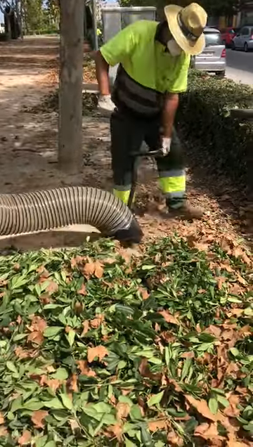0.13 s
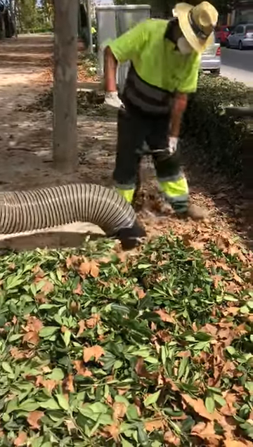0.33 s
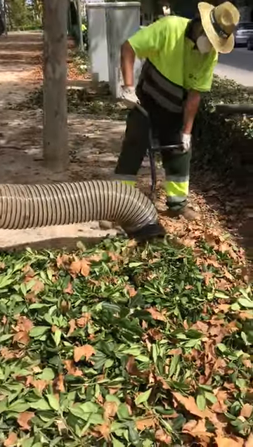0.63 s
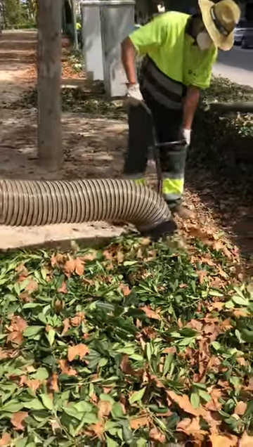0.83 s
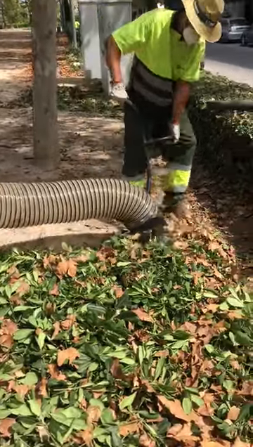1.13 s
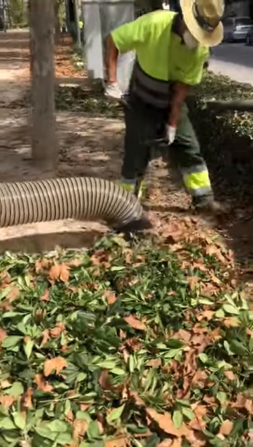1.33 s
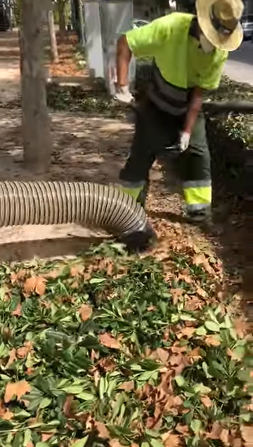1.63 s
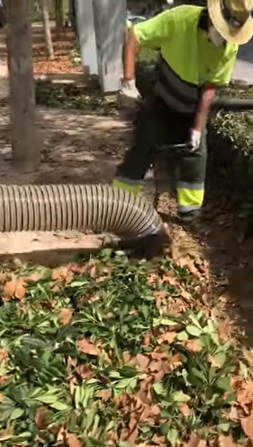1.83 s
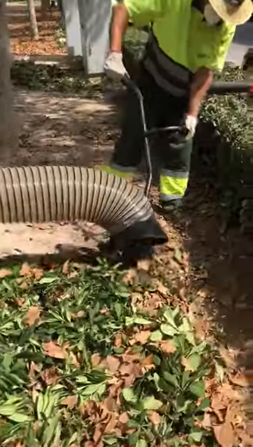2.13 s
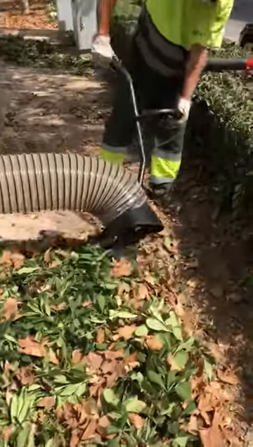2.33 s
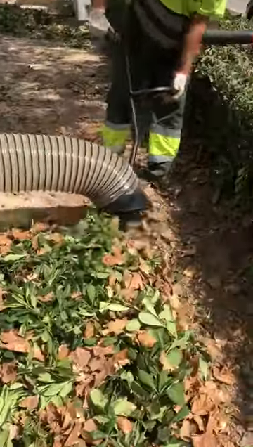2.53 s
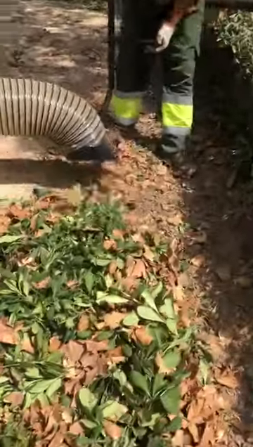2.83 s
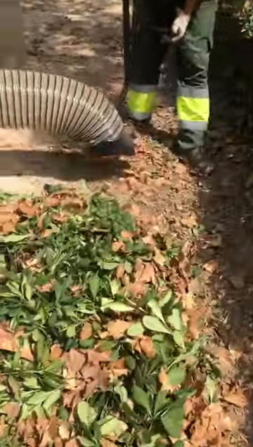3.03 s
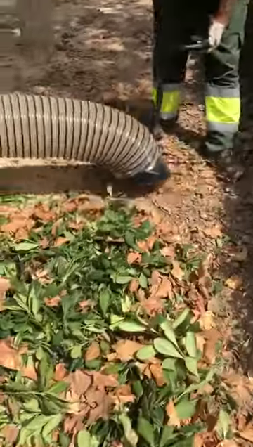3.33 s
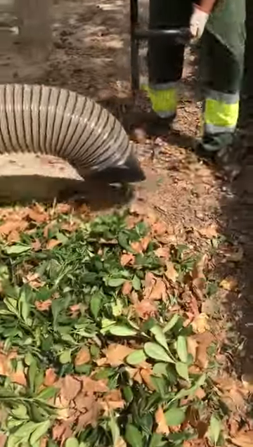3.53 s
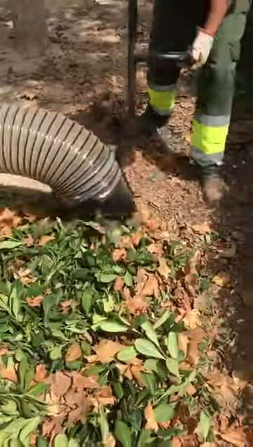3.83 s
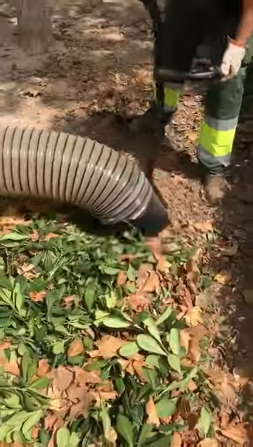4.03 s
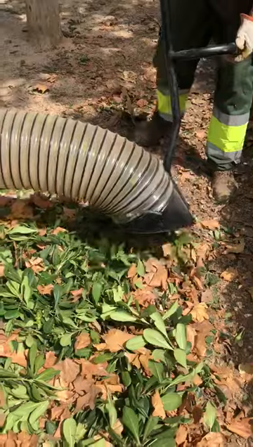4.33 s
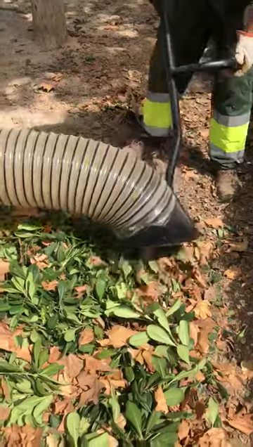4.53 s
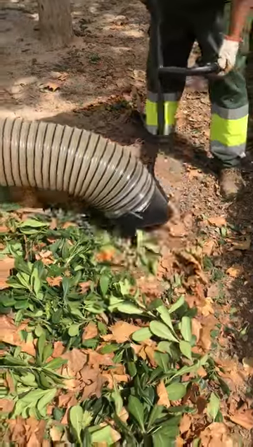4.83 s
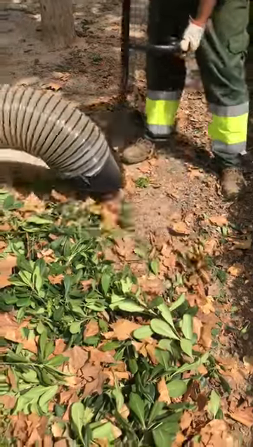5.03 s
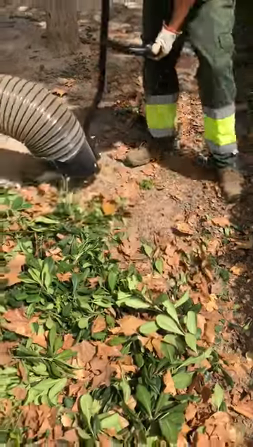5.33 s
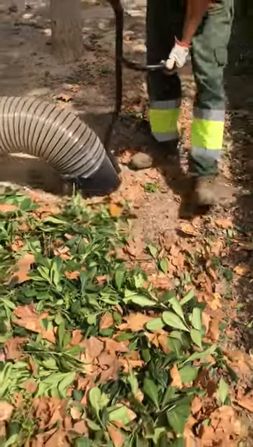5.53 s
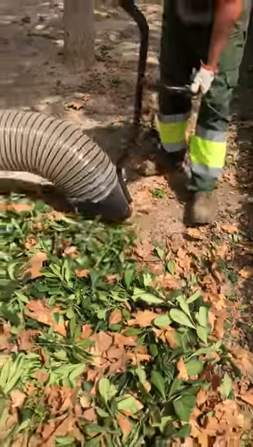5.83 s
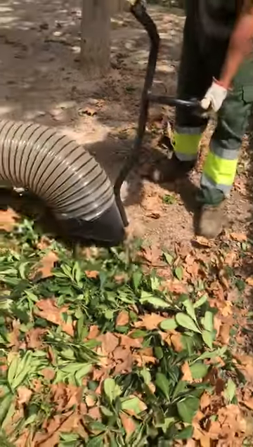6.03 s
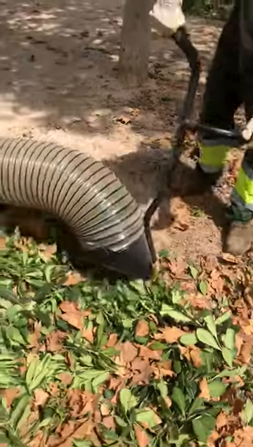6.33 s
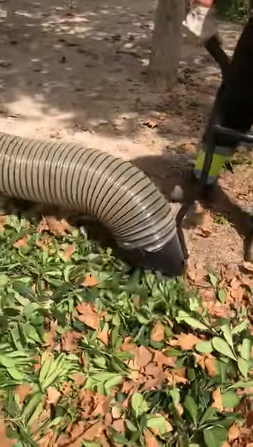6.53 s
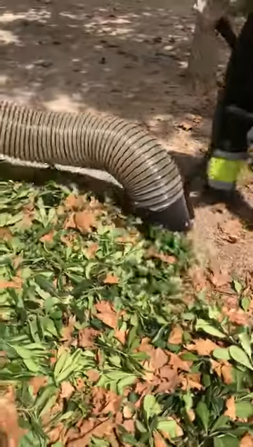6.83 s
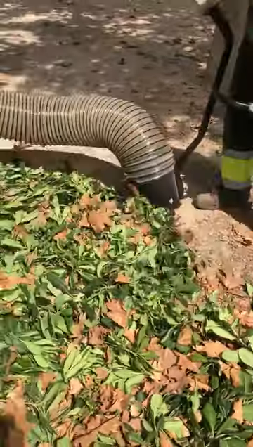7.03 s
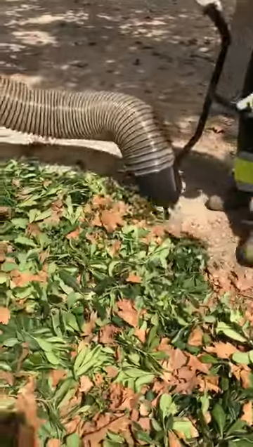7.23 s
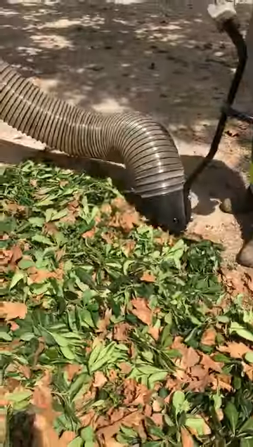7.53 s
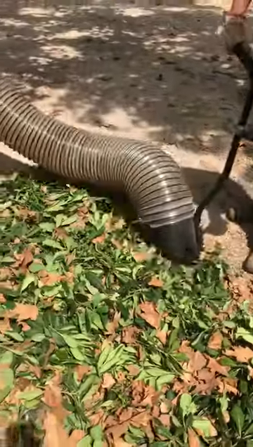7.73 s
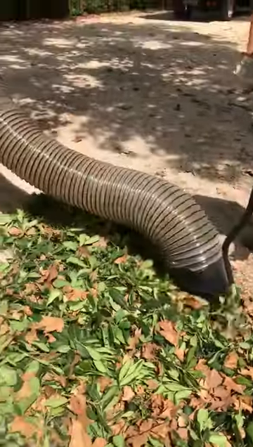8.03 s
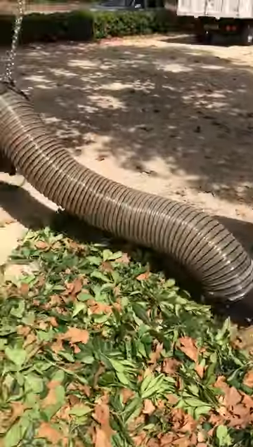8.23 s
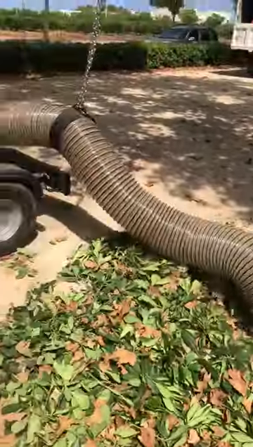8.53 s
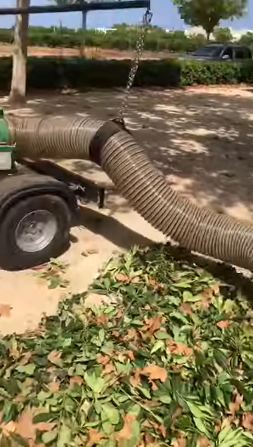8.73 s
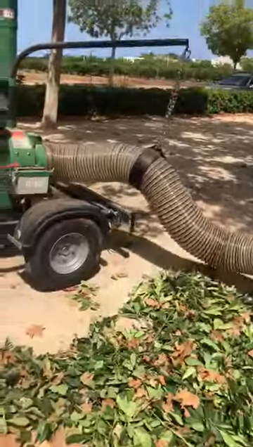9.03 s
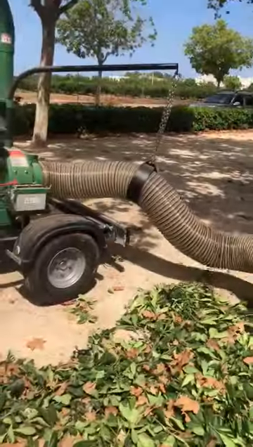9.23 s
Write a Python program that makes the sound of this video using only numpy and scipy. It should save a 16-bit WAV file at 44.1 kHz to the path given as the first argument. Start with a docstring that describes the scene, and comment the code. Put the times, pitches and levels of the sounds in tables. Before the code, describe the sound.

Engine-driven fan hums low under rushing hose air, with bursts of crunching leaves, sharp twig ticks, stone pings and dull thumps growing denser.

```python
"""A leaf vacuum on a trailer runs beside a street for nine seconds, heard a few metres away.
From the start a four-stroke engine turns a four-blade fan (steady tones) and air roars up the ribbed hose
(coloured noise). Gulps of leaves crackle at once, twigs snap (click and noise burst), stones ring the fan
wheel (fading tones), and from 0.6 s clumps thud on the hose (low fading tones). The main blade tone peaks
near 3.6 s, the hardest thud comes at 5.2 s, gulps crowd in after 6 s, and the strongest bursts at 8.8 s."""
import sys
import numpy as np
from scipy import signal
from scipy.io import wavfile
from scipy.ndimage import uniform_filter1d

SR = 44100
rng = np.random.default_rng(int(sys.argv[2]) if len(sys.argv) > 2 else 0)


def store_pcm(level_fs):
    """Save levels as 16-bit WAV."""
    pcm = np.round(np.clip(level_fs, -1, 1) * 32767).astype(np.int16)
    wavfile.write(sys.argv[1], SR, np.atleast_2d(pcm).T)


N = 414099
T = np.arange(N) / SR  # time, s
COARSE_T = T[::64]  # a coarser clock for slow curves, s

# All levels are as they stand before the ground and the microphone.
# fan speed and its lower tones: (t/s, blade rate f/Hz, blade tone level/dB, 2nd harmonic level/dB)
FAN_SPEED = [(0, 206.2, -21, -36.5), (.55, 207.7, -21, -35), (1.02, 208.4, -27, -38.5),
             (1.14, 207.7, -36, -40), (1.21, 209, -24, -37), (1.62, 207.5, -27.5, -32.5),
             (1.8, 209.4, -21.5, -38.5), (2, 210.5, -15.5, -42), (2.25, 210.1, -18, -50),
             (2.48, 207.4, -18, -50), (2.56, 206.7, -15, -31.5), (2.77, 206.3, -17.5, -41),
             (2.95, 208.5, -17.5, -30.5), (3.11, 207, -15, -38.5), (3.48, 210.2, -17.5, -28.5),
             (3.63, 204, -12, -47), (3.72, 203.3, -20, -39), (3.95, 205.2, -17.5, -29),
             (4.13, 208.6, -16, -51.5), (4.47, 208.6, -14.5, -32.5), (4.84, 206, -15.5, -39),
             (5, 208.8, -18.5, -38.5), (5.33, 209.2, -20, -28.5), (5.65, 206.5, -21, -44),
             (5.95, 208, -24, -30), (6.4, 207.8, -25, -34.5), (7.01, 205, -25, -31.5),
             (7.5, 205.7, -27, -33), (7.79, 207.6, -22, -27), (7.9, 209.6, -32, -33),
             (8.22, 208.3, -39, -28.5), (8.3, 207, -22, -26.5), (8.55, 205.5, -30, -32),
             (8.84, 204, -20.5, -32), (9.15, 206, -18, -48), (9.39, 209.4, -16.5, -31)]
# higher blade tones: (t/s, 3rd harmonic level/dB, 4th harmonic level/dB)
UPPER_BLADE_TONES = [(0, -37, -35), (.8, -50, -39), (1.3, -40, -37), (2.4, -39, -38.5), (3.4, -42, -44),
                     (4.1, -36, -51), (5.2, -44, -39.5), (6.5, -34, -39), (7.9, -32, -46), (8.3, -34, -30),
                     (9.39, -35.5, -48)]
# exhaust tones, as multiples of the engine cycle rate: (multiple)
EXHAUST_MULTIPLES = [2, 3, 4, 5, 6, 7, 9, 10, 11, 12, 13, 14, 18, 22, 28]
# how loud each exhaust tone is: (level/dB)
EXHAUST_LEVELS = [-39, -36.5, -35.5, -25.5, -33, -34.5, -38, -42.5, -46.5, -46, -40.5, -47.5, -43, -47, -43]
# air in the hose with no gulp: (t/s, roar level/dB, rumble level/dB, buffeting level/dB)
AIR_LEVELS = [(0, -26, -31, -36.5), (.5, -27.5, -30, -35), (.95, -28.5, -38, -34), (1.4, -27, -27, -36),
              (1.7, -27, -42, -36), (2.2, -28, -31, -34), (2.5, -27, -27, -30), (2.9, -27.5, -26.5, -35),
              (3.4, -27.5, -26, -31), (3.8, -26, -30, -30), (4.2, -27, -30, -32), (4.6, -27, -24, -29),
              (5, -26, -22, -26), (5.45, -24.5, -28.5, -36), (5.62, -25.5, -23, -28),
              (5.8, -26.5, -27, -31), (6.2, -24.5, -27.5, -32), (6.6, -23.5, -22, -36),
              (7, -24, -30.5, -29), (7.5, -24.5, -25.5, -44), (7.9, -24, -26.5, -26), (8.4, -25, -25, -34),
              (8.8, -24, -23, -33), (9.1, -26.5, -36, -30), (9.39, -24.5, -32, -35)]
# colour of the rumble: (f/Hz, level/dB)
RUMBLE_COLOUR = [(70, -30.5), (92, -19), (105, -0.5), (116, 1.5), (142, -10), (170, 0), (185, 0.5),
                 (225, -6), (270, -19.5), (330, -29.5), (600, -58)]
# colour of the roar: (f/Hz, level/dB)
ROAR_COLOUR = [(150, -31), (260, -0.5), (330, -1.5), (430, -5.5), (520, -2.5), (640, 1), (830, 0),
               (1000, -4), (1400, -30.5)]
# colour of the steady hiss: (f/Hz, level/dB)
HISS_COLOUR = [(700, -21), (1000, -1.5), (1220, 7), (1350, 1.5), (2100, 1), (2600, -4), (3400, 0),
               (4400, -4), (12000, -3)]
# colour of the deep buffeting: (f/Hz, level/dB)
BUFFET_COLOUR = [(25, -22), (45, -9), (65, -3), (85, -0.5), (120, -15), (200, -51)]
# colour of shredded leaves and snapped twigs: (f/Hz, level/dB)
SHRED_COLOUR = [(200, -7.5), (430, -11), (640, 1.5), (1020, -4), (1220, 3), (1350, -2), (1600, 1.5),
                (2150, 1), (2600, -2), (3400, 0), (4500, -3), (12000, -6)]
# thin stream of leaves between the gulps: (t/s, level/dB)
LEAF_STREAM = [(0, -26), (.5, -27), (1, -28.5), (1.8, -29), (2.5, -24.5), (2.75, -32), (3.3, -27.5),
               (4, -29), (4.4, -28), (5, -29.5), (5.75, -30.5), (6.1, -22.5), (6.8, -33), (7.8, -28),
               (8.2, -26), (9.1, -22), (9.39, -29)]
# gulps passing the fan: (peak t/s, peak level/dB, time to fade 10 dB t/s, brightness/dB per octave);
# a negative fading time turns the shape round: a slow swell, then a quicker fade
LEAF_GULPS = [(0.029, -17, .04, 2), (.15, -17, 0.06, -0.5), (.23, -13, .035, -1.5), (.33, -17.5, .06, 1),
              (.4, -17.5, 0.08, 1), (.6, -27, 0.4, -2), (.71, -20, 0.02, 0.5), (1.2, -21.5, 0.12, -2.5),
              (1.31, -26, 0.17, 2), (1.36, -22.5, 0.1, -3.5), (1.43, -21, 0.13, 0), (1.99, -24.5, .1, -2.5),
              (2.41, -25, .06, -2), (2.58, -21.5, .06, 0), (2.66, -21, .025, 0), (2.85, -20.5, .04, 0),
              (2.9, -25, .05, 1), (3.59, -13, 0.06, -0.5), (4.5, -21.5, 0.2, 0), (4.57, -17.5, 0.12, -1),
              (4.69, -21.5, 0.14, 0), (4.76, -20.5, 0.02, -1), (5.12, -24.5, 0.08, -2),
              (5.23, -20, 0.06, -0.5), (5.33, -18, 0.1, -2.5), (5.6, -22.5, -0.06, -2),
              (5.91, -26.5, 0.46, 1.5), (6.29, -22.5, .05, -4.5), (6.49, -20.5, 0.07, -1.5),
              (6.62, -19, 0.13, -1.5), (6.72, -21.5, 0.12, 1.5), (6.88, -18, .12, -.5),
              (7.02, -15, .06, -1.5), (7.06, -17, -0.03, -1), (7.17, -21.5, 0.2, -1.5),
              (7.24, -20, 0.17, -0.5), (7.33, -20, 0.1, -2.5), (7.399, -16, 0.05, -1.5),
              (7.5, -23, -0.04, 5), (7.63, -19, .07, -2), (7.74, -22.5, .065, -4), (7.9, -21, -0.03, .5),
              (8., -18.5, 0.09, 0.5), (8.21, -21.5, 0.1, 0), (8.29, -20, 0.1, -4), (8.34, -17, .04, -1.5),
              (8.47, -20, 0.03, 1), (8.51, -20, .05, -2.5), (8.66, -18, .04, -1), (8.71, -17.5, 0.1, -3),
              (8.761, -8.5, 0.01, -1), (8.86, -20.5, 0.13, -1), (8.92, -24, 0.1, 0), (9.01, -23, 0.3, -4),
              (9.31, -22, .1, 0.5)]
# twigs and clumps striking the blades: (t/s, level/dB, brightness/dB per octave)
TWIG_SNAPS = [(0.141, -23.5, 2), (0.5913, -18, -1.5), (0.685, -14, -0.5), (0.7781, -19, -4),
              (1.3488, -16.5, -2), (1.4177, -12.5, 0), (1.5735, -14, 5), (2.8225, -17.5, 0.5),
              (2.9001, -22.5, 1), (3.457, -23, -3), (3.5458, -20, -11), (4.2532, -19.5, -6),
              (4.4746, -20, -2), (4.5168, -18.5, -4), (4.6701, -22, -4), (5.1147, -16.5, -4.5),
              (5.2145, -17.5, -3), (5.5319, -15, 8.5), (5.7621, -22, 1.5), (5.8907, -16, 1),
              (6.068, -16, 4), (6.189, -23, 3), (6.4815, -16.5, -2.5), (6.542, -19, -9), (6.5935, -15, 2),
              (7.4937, -20, 0), (7.612, -12, 1), (7.86, -20.5, -1), (7.8984, -21.5, -3),
              (7.9618, -19, -5.5), (8.2008, -22.5, -2), (8.2924, -13.5, 1.5), (8.708, -30, -3),
              (8.748, -26, -10), (9.03, -18.5, -2.5), (9.0748, -18, 1)]
# stones on the fan wheel: (t/s, level/dB, brightness/dB per octave)
STONE_HITS = [(0.328, -26, -8), (2.4883, -28, -4), (2.6247, -35, 13), (3.8448, -32, 3), (4.1, -32, -16),
              (4.9061, -31, -13), (6.1044, -28.5, 15.5), (6.2584, -30.5, 7), (6.7197, -27.5, -5),
              (7.926, -30.5, 7), (8.01, -21, 8), (8.844, -20.5, 1)]
# pitches at which the steel wheel rings: (f/Hz)
WHEEL_PITCHES = [3185, 4114, 5232, 6534, 7203, 7990, 11412]
# how the wheel rings at each pitch: (level/dB, time to fade 60 dB t/s)
WHEEL_RINGING = [(-5, .4), (0, 0.37), (-3, 0.3), (-4, .3), (-4, 0.065), (-0.5, 0.22), (-3, 0.13)]
# heavy clumps along the hose wall: (t/s, level before the soft start/dB, f/Hz)
HOSE_THUDS = [(0.619, -11, 127), (2.598, -11, 135), (3.586, -8, 135.8), (4.257, -9, 110.3), (4.56, -5, 156),
              (4.739, -8, 122.7), (5.21, -2, 124), (5.329, -7, 128.9), (5.589, -5, 122.2), (6.479, -6, 121),
              (7.429, -7.5, 139), (7.849, -8, 139), (7.889, -8, 140.5), (8.749, -19, 128),
              (9.085, -10, 139)]
# the bounce off the ground cancels a band that slides down as the listener turns: (t/s, f/Hz, depth/dB)
GROUND_BAND = [(0, 1090, -4.5), (2.5, 1074, -5.5), (4.5, 966, -7), (6, 953.8, -7), (7.5, 916, -10),
               (8.5, 869, -9), (9.39, 860, -7)]
# microphone and its housing: (f/Hz, level/dB)
MIC_COLOUR = [(20, -21), (38, -7), (50, -1), (4800, -2), (5500, -2), (5850, -15), (6140, -26.5),
              (6500, -12), (7250, -6), (8200, -16.5), (9100, -22), (9800, -17.5), (11000, -27.5),
              (11800, -37)]

BLADES_PER_CYCLE = 8  # four blades, two turns a cycle
HISS_DB = -25.5
# how far the fullest gulp lifts each layer of the air, dB
LOAD_ROAR_DB, LOAD_RUMBLE_DB, LOAD_BUFFET_DB = 2.5, 4.5, 2
RISE_SHARE = 0.64  # a gulp swells 10 dB in this share of its fading time
TEARS_PER_S, GRIT_PER_S, GRIT_DB = 1200, 150, -30.5
SNAP_RISE_S, SNAP_T60_S = 0.0014, 0.12  # T60: time to fade 60 dB
CRACK_S, CRACK_DB, CLICK_DB = 0.004, 0.5, 7
THUD_RISE_S, THUD_T60_S = 0.011, 0.1
DIP_WIDTH_HZ = 95  # half-width of the bell-shaped dip (one sigma)
EDGE_HZ = 11900  # top of the recorded band

BLADE_HZ = np.interp(T, *np.transpose(FAN_SPEED)[:2])
CYCLE = 2 * np.pi * np.cumsum(BLADE_HZ) / BLADES_PER_CYCLE / SR  # engine phase, radians


def machine():
    """Blade and exhaust tones share one shaft; turbulence makes each waver in level and phase."""
    blades = curves(FAN_SPEED)[1:] + curves(UPPER_BLADE_TONES)
    tones = [(BLADES_PER_CYCLE * (k + 1), db) for k, db in enumerate(blades)]
    tones += [*zip(EXHAUST_MULTIPLES, EXHAUST_LEVELS)]
    out = np.zeros(N)
    for multiple, db in tones:
        shake = wander(8.7)
        # the same drift played backwards moves the phase
        phase = multiple * CYCLE + 2 * np.pi * rng.random() + 0.26 * shake[::-1]
        out += np.sqrt(2) * amp(db + 1.35 * shake) * np.cos(phase)
    return out


def roar():
    """Air rushing up the hose: noise that throbs with each turn of the shaft and swells with gulps."""
    throb = 1 + 0.1 * np.cos(2 * CYCLE) + 0.098 * np.cos(2 * 2 * CYCLE)
    noise = rng.standard_normal(N) * throb * amp(1.1 * wander(23.0))
    level_db = curves(AIR_LEVELS)[0] + LOAD_ROAR_DB * load()
    return amp(level_db) * evened(colour(noise, ROAR_COLOUR))


def rumble():
    """The low, lumpy part of the air column, also swelling with each gulp."""
    noise = rng.standard_normal(N) * amp(3.0 * wander(20.0))
    level_db = curves(AIR_LEVELS)[1] + LOAD_RUMBLE_DB * load()
    return amp(level_db) * evened(colour(noise, RUMBLE_COLOUR))


def hiss():
    """Air at the fan outlet: noise with small flickers at three speeds around a steady level."""
    flicker_db = 0.7 * wander(7.0) + 1.5 * wander(30.0) + 0.73 * wander(200.0)
    noise = rng.standard_normal(N) * amp(flicker_db)
    return amp(HISS_DB) * evened(colour(noise, HISS_COLOUR))


def leaves():
    """Shredding: many small clumped tears, each with a short rattle in the housing, plus ringing grit."""
    each = gulps()
    power = amp(curves(LEAF_STREAM)[0][::64]) ** 2 + each.sum(0)
    # the brightness leans towards whichever gulp is strongest
    tilt_db = np.transpose(LEAF_GULPS)[3] @ each / power

    tears = amp(4.1 * np.minimum(rng.exponential(1, N), 5)) * (rng.random(N) < TEARS_PER_S / SR)
    rattle_fade = amp(-60 * T[:2000] / 0.02)
    rattle = abs(signal.oaconvolve(tears, rattle_fade)[:N])
    crackle = colour(np.sqrt(evened(rattle) + 1.06) * rng.standard_normal(N), SHRED_COLOUR)

    # every handful of leaves has its own colour: smooth random patches over pitch and time
    hz, t, z = signal.stft(evened(crackle), SR, nperseg=256)
    patches = uniform_filter1d(rng.standard_normal(z.shape[::-1]).T, 5, 0)
    patches = evened(uniform_filter1d(patches, 8, 1))
    octaves = np.log2(np.clip(hz, 500, 9000) / 2500)[:, None]
    z *= amp(2.33 * patches + octaves * np.interp(t, COARSE_T, tilt_db))
    shredding = signal.istft(z, nperseg=256)[1][:N]
    flow = np.interp(T, COARSE_T, np.sqrt(power)) * amp(0.77 * wander(30.0))

    # grit among the leaves keeps the wheel faintly ringing
    grit = amp(3 * np.minimum(rng.exponential(1, N), 3)) * (rng.random(N) < GRIT_PER_S / SR) * flow
    ringing = signal.oaconvolve(grit, ring(0.0, rng.random(len(WHEEL_RINGING))))[:N]
    return flow * shredding + amp(GRIT_DB) * ringing


def gulps():
    """Power of each gulp over time: a straight swell and a straight fade in dB."""
    s, db, fade_s, _ = np.transpose(LEAF_GULPS)[:, :, None]
    late = (COARSE_T - s) / fade_s
    drop = np.where(late < 0, -late / RISE_SHARE, late)
    return amp(db - 10 * drop) ** 2


def load():
    """How full of leaves the fan is, from the summed gulps; 1 at the fullest moment."""
    size = np.sqrt(gulps().sum(0))
    return np.interp(T, COARSE_T, size / size.max())


def snaps():
    """A twig gives a click and a sudden noise burst that dies away in the housing."""
    out, t = np.zeros(N), T[:SR // 5]
    click = 1.0 * (t == 0)
    crack = 1 + amp(CRACK_DB) * np.exp(-t / CRACK_S)
    shape = amp(-60 * t / SNAP_T60_S) * np.minimum(t / SNAP_RISE_S, 1) * crack
    for s, db, tilt_db in TWIG_SNAPS:
        blow = shape * rng.standard_normal(len(t)) + amp(CLICK_DB) * click
        tint = [(hz, level + tilt_db * np.log2(hz / 2500)) for hz, level in SHRED_COLOUR]
        # divide by the filter's own strength, so brightness does not set the level
        add(out, s, amp(db) * colour(blow, tint) / np.linalg.norm(colour(click, tint)))
    return out


def stones():
    """Each small stone makes the steel fan wheel ring."""
    out = np.zeros(N)
    for s, db, tilt_db in STONE_HITS:
        add(out, s, amp(db) * ring(tilt_db, rng.random(len(WHEEL_RINGING))))
    return out


def ring(tilt_db, turns):
    """The wheel after one blow: a fading sine at each pitch, started at the given parts of a turn."""
    out, t = 0, T[:SR // 3]
    for hz, (db, t60), turn in zip(WHEEL_PITCHES, WHEEL_RINGING, turns):
        level_db = db + tilt_db * np.log2(hz / 4114) - 60 * t / t60
        out = out + amp(level_db) * np.sin(2 * np.pi * (hz * t + turn))
    return out


def thuds():
    """Each clump gives the hose one soft, low push: a fading sine."""
    out, t = np.zeros(N), T[:SR // 4]
    for s, db, hz in HOSE_THUDS:
        shape = amp(db - 60 * t / THUD_T60_S) * np.minimum(t / THUD_RISE_S, 1)
        add(out, s, shape * np.sin(2 * np.pi * hz * t))
    return out


def buffet():
    """Slow, uneven pushes of air at the bottom of the range, stronger with each gulp."""
    noise = rng.standard_normal(N) * amp(2.5 * wander(4.9))
    level_db = curves(AIR_LEVELS)[2] + LOAD_BUFFET_DB * load()
    return amp(level_db) * evened(colour(noise, BUFFET_COLOUR))


def ground(x):
    """The bounce off the ground cancels part of the sound: one band is lowered, frame by frame."""
    hz, t, z = signal.stft(x, SR, nperseg=1024)
    centre_hz, depth_db = (np.interp(t, T, c) for c in curves(GROUND_BAND))
    bell = np.exp(-0.5 * ((hz[:, None] - centre_hz) / DIP_WIDTH_HZ) ** 2)
    z *= amp(depth_db * bell)
    return signal.istft(z, nperseg=1024)[1][:N]


def amp(db):
    """Turns dB into a gain."""
    return 10 ** (np.asarray(db) / 20)


def evened(x):
    """Scales to an average strength (rms) of 1."""
    return x / np.sqrt(np.mean(x ** 2) + 1e-20)


def read(points, hz):
    """Reads a colour table between its points, on a log-frequency axis."""
    f, value = np.transpose(points)
    return np.interp(np.log(hz + 1), np.log(f + 1), value)


def curves(rows):
    """Turns each column of a table into a curve over time."""
    s, *columns = np.transpose(rows)
    return [np.interp(T, s, c) for c in columns]


def add(mix, s, sound):
    """Mixes a sound in at second s."""
    part = mix[round(s * SR):][:len(sound)]
    part += sound[:len(part)]


def colour(x, points):
    """Filters to the given colour without sounding ahead of time (minimum phase)."""
    log_gain = np.log(amp(read(points, abs(np.fft.fftfreq(8192, 1 / SR)))))
    taps = np.fft.ifft(np.exp(signal.hilbert(log_gain).conj())).real[:4096]
    return signal.oaconvolve(x, taps)[:len(x)]


def wander(top_hz):
    """Random drift of rms 1: noise with everything faster than top_hz smoothed away."""
    smooth = signal.butter(2, top_hz, fs=SR, output="sos")
    return evened(signal.sosfilt(smooth, rng.standard_normal(N)))


def scene():
    """All sources, heard over hard ground."""
    moving_air = roar() + rumble() + hiss() + buffet()
    debris = leaves() + snaps() + stones() + thuds()
    return ground(machine() + moving_air + debris)[None]


def record(dry):
    """A small microphone colours the sound, then the top of the band is cut off."""
    heard = colour(dry[0], MIC_COLOUR)[None]
    low_pass = signal.firwin(511, EDGE_HZ, window=("kaiser", 9), fs=SR)
    return signal.oaconvolve(heard, low_pass[None], "same")


dry = scene()
out = record(dry)
store_pcm(out)
```